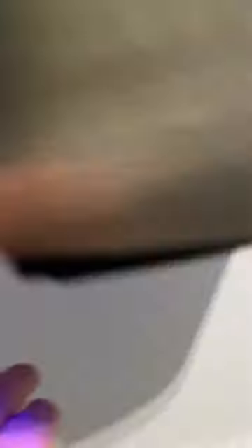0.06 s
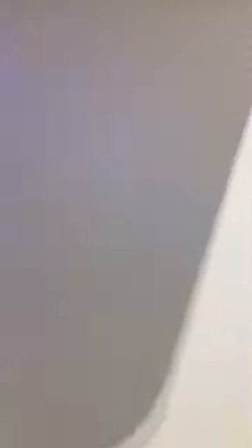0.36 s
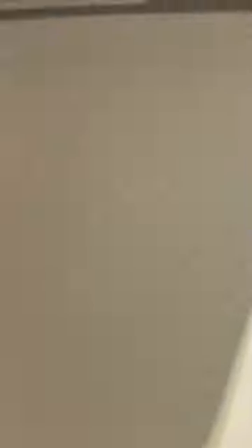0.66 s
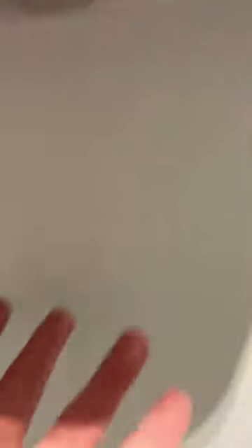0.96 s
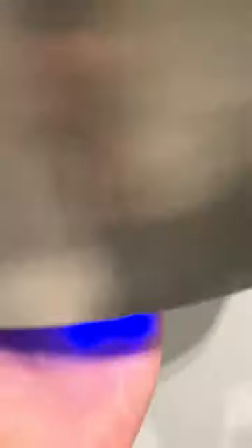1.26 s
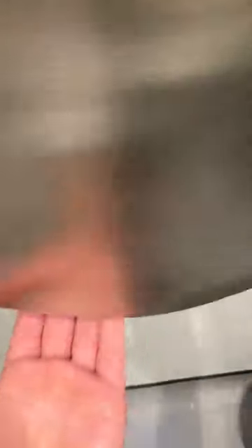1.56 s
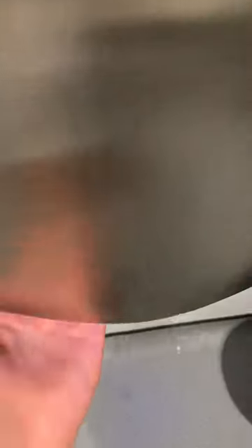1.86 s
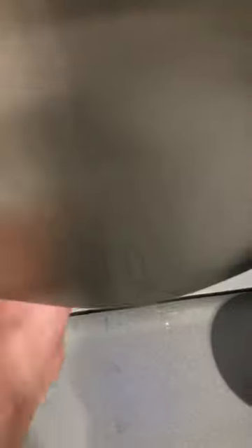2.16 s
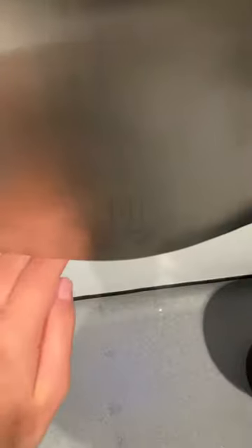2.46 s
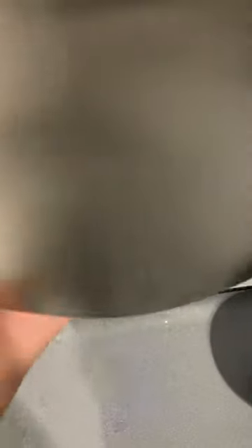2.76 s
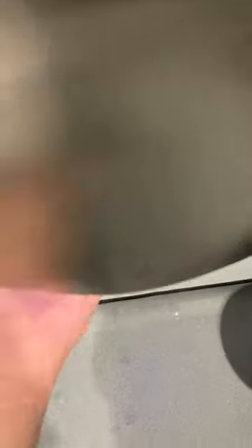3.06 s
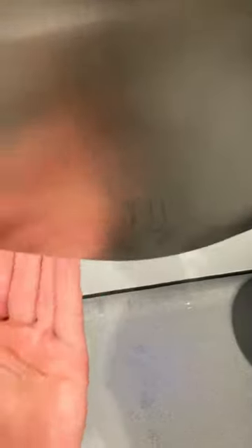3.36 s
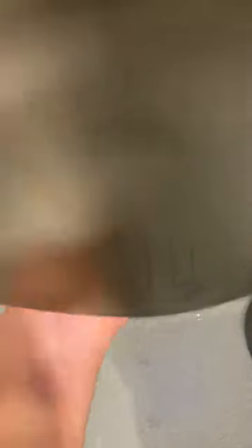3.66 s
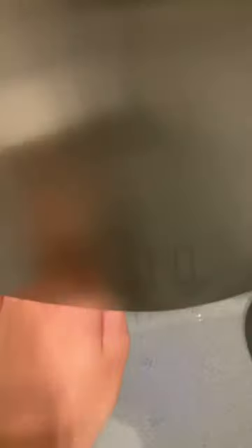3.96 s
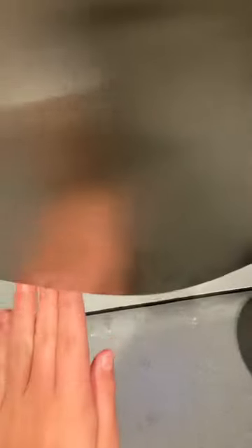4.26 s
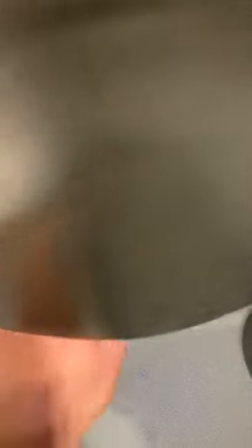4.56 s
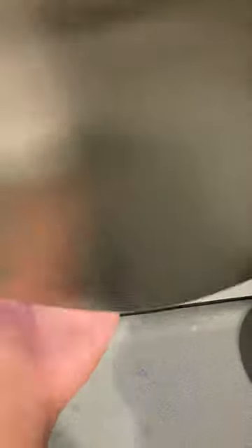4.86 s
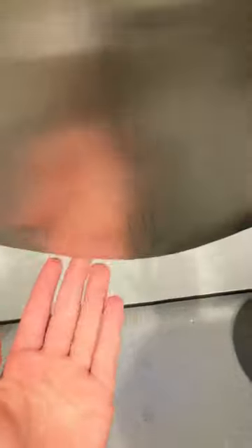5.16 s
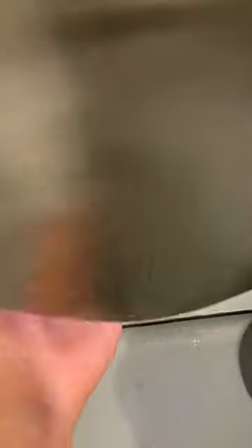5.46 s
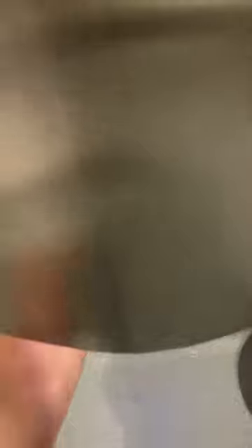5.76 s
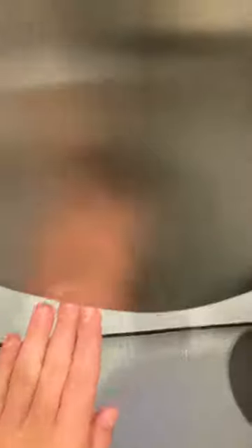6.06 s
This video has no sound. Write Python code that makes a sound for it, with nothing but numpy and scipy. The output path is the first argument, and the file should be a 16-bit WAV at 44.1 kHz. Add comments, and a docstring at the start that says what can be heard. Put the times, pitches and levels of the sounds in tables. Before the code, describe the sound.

Steady blowing and motor hum from a washroom hand dryer, sagging briefly early on, with repeated whooshes of air over a moving hand.

```python
"""A small tiled washroom, where an electric hand dryer runs close to a phone with two microphone ports.
Rotor unbalance hums at the shaft rate and drives the room's standing waves; the fan blades add a whine.
The motor cuts out for nearly half a second, coasts against air drag, and spins up when a hand returns.
The turbulent jet roars steadily, rushes and hisses on the turning hand, and at first buffets the ports."""
import sys
import numpy as np
from scipy import signal
from scipy.fft import rfft, irfft
from scipy.io import wavfile
from scipy.ndimage import uniform_filter1d

SR = 44100
rng = np.random.default_rng(int(sys.argv[2]) if len(sys.argv) > 2 else 0)


def wrap_up_sound(samples):
    """Save the sound to the file named by the first command line argument, as 16-bit audio."""
    columns = np.atleast_2d(samples).T
    # keep every value between -1 and 1, then stretch to whole-number steps
    tamed = np.clip(columns, -1, 1)
    steps = np.round(tamed * 32767).astype(np.int16)
    wavfile.write(sys.argv[1], SR, steps)


N = 270333
T = np.arange(N) / SR
HZ = np.fft.rfftfreq(N, 1 / SR)
FULL_HZ = 457.6  # shaft rate at full speed
POWER_OFF_S, POWER_ON_S = .602, 1.041

# resonances of housing, basin and room: f/Hz, width/Hz, lift/dB
ROOM_MODES = [(148.1, 12, 13.5), (168.4, 7.8, 6), (200.6, 8, 11.5), (249, 9, 7.5), (278.4, 7, 4.5),
              (311, 12, 4), (471, 7, 10), (629, 5.5, 8.5), (670, 11, 3), (678, 10, 3), (736, 32, 4.5),
              (812.4, 8.8, 7), (854, 8.1, 7), (1050, 36, 4), (1220, 21, 4), (1470, 8.4, 10), (1698, 14, 9),
              (2000, 90, 1)]
# resonances of the nozzle: f/Hz, width/Hz, lift/dB
NOZZLE_MODES = [(3020, 230, 2), (3850, 200, 0), (4720, 770, 4.5)]
# turns of the hand through the jet: peak t/s, rise/s, fall/s, rush level/dB, spill level/dB,
# hiss level/dB, f/Hz of the hollow above the palm, gain of its resonance
HAND_TURNS = [(0.29, 0.27, 0.11, -26.5, -35, -33, 1490, 0.33),
              (0.565, 0.18, 0.13, -29.5, -34, -29.5, 1720, 0.23),
              (0.744, 0.19, 0.24, -40.5, -42, -32.5, 2270, 0.45),
              (1.38, 0.15, 0.074, -36, -40.5, -44, 1560, 0.84),
              (1.58, 0.18, 0.35, -31, -34.5, -38, 1520, 0.18),
              (1.748, 0.17, 0.12, -30.5, -41, -47, 1480, 0.73),
              (2.31, 0.052, 0.26, -32, -34, -36, 1440, 0.33), (2.533, 0.11, 0.11, -31, -37, -36, 1470, 0.4),
              (2.85, 0.25, 0.42, -41.5, -43.5, -47, 1130, 0.54),
              (3.17, 0.11, 0.12, -27.5, -33.5, -49, 1970, 0.7),
              (3.344, 0.28, 0.11, -33, -38, -31.5, 1980, 0.73),
              (3.41, 0.073, 0.17, -27.5, -34, -39.5, 1270, 0.3),
              (3.74, 0.53, 0.11, -38.5, -57, -44, 1180, 0.74),
              (4.01, 0.13, 0.11, -31, -38.5, -46, 1410, 0.41),
              (4.075, 0.09, 0.13, -47, -33, -34, 1590, 0.46),
              (4.276, 0.097, 0.13, -48, -35, -37.5, 1980, 0.58),
              (4.405, 0.15, 0.12, -30.5, -39.5, -54, 1550, 0.59),
              (4.69, 0.15, 0.4, -40.5, -52, -46, 1150, 0.53),
              (4.908, 0.046, 0.14, -27.5, -38, -48, 1250, 1.4),
              (5.06, 0.25, 0.08, -35.5, -34.5, -38.5, 1590, 0.4),
              (5.225, 0.085, 0.18, -29, -35.5, -38.5, 1570, 0.78),
              (5.62, 0.39, 0.22, -41.5, -47, -45, 1150, 0.95),
              (5.88, 0.061, 0.1, -31, -38, -42, 1310, 0.61),
              (5.965, 0.063, 0.092, -31, -32.5, -38, 1760, 0.25),
              (6.1, 0.026, 0.077, -41, -39, -41, 1500, 0.37)]


def motor(shaft_hz, unsteady_hz=0.25):
    """A rotor radiates at its slightly unsteady rate of rotation and at multiples of it."""
    rotor_hz = shaft_hz + unsteady_hz * wander(11.3)
    return hum(rotor_hz) + whine(shaft_hz, rotor_hz)


def shaft_speed(half_speed_s=1.165, spin_up_s=.275, spin_up_shape=.948):
    """Quadratic air drag slows the unpowered rotor; under power the lost speed decays away."""
    unpowered_s = np.clip(T, POWER_OFF_S, POWER_ON_S) - POWER_OFF_S
    coasting_hz = FULL_HZ / (1 + unpowered_s / half_speed_s)
    still_lost = np.exp(-(np.maximum(T - POWER_ON_S, 0) / spin_up_s) ** spin_up_shape)
    return FULL_HZ - (FULL_HZ - coasting_hz) * still_lost


def hum(rotor_hz, gain_db=0.73, waver_db=0.87):
    """Rotor unbalance radiates a pure hum; it swells, dips sharply and shifts between left and right."""
    # course of the hum: t/s, relative level/dB, left minus right/dB
    hum_level = [(0.0, -15, -2), (0.3, -13.1, 0), (0.6, -11.5, 2.5), (0.76, -16.5, 1.8), (0.92, -21.5, 5),
                 (1.08, -19, 3.9), (1.22, -21.5, 5.4), (1.4, -19, 3), (1.54, -20.5, 13), (1.595, -35, -2),
                 (1.635, -20, 5.0), (1.77, -17.5, 2.1), (1.82, -25, 13.6), (1.95, -28.0, 6.6),
                 (2.15, -19, -1.5), (2.34, -17, 0.2), (2.6, -20, -1.3), (2.86, -23.1, -7.5),
                 (3.3, -18, 0.5), (3.8, -23, -5.5), (4.2, -19, -0.9), (4.47, -18.5, -2.2),
                 (4.65, -20.5, -4.3), (4.85, -20, -1.6), (5.27, -15.5, -0.5), (5.5, -18.5, -3),
                 (5.64, -23, -1.6), (6.13, -19.5, 0.5)]
    ports = standing_waves(rotor_hz)
    strength = amp(gain_db + curve(hum_level) + waver_db * wander(32))
    return ports * strength * panned(curve(hum_level, column=2))


def standing_waves(hz, direct_gain=0.035, right_lead_rad=0.37):
    """Forced vibration: a tone drives the room's modes, which ring on and beat with it as it glides."""
    # modes in and around the hum's range: f/Hz, width/Hz, signed gain at left port, at right port
    modes = [(339.0, 3.3, -0.35, -0.49), (347.7, 4.6, -0.4, -0.76), (366.0, 19.4, 0.12, 0.08),
             (378.9, 5.5, 0.93, 1.06), (380.6, 10.4, -1.22, -1.8), (397.1, 6.3, 0.62, 0.33),
             (404.7, 15.3, 0.87, -0.65), (409.3, 26.0, -1.9, -0.21), (417.1, 12.7, 1.72, 1.1),
             (424.6, 3.6, 0.3, 0.24), (434.6, 1.4, -0.24, -0.14), (436.9, 4.9, 0.4, 1.29),
             (441.4, 1.9, 0.47, 0.96), (448.0, 8.9, 1.54, 0.5), (451.0, 17.6, -2.5, 0.34),
             (455.2, 42.1, 1.24, -0.55), (456.1, 4.8, 1.11, 0.76), (467.7, 3.5, -1.36, 4.18)]
    settled_hz = np.pad(hz, (SR, 0), "edge")  # a second's lead lets the modes build up
    drive = np.exp(2j * np.pi * (np.cumsum(settled_hz) / SR + rng.random()))
    ports = direct_gain * drive[SR:]
    for mode_hz, width_hz, left, right in modes:
        radius = np.exp(-np.pi * width_hz / SR)
        ring = signal.lfilter([1 - radius], [1, -radius * np.exp(2j * np.pi * mode_hz / SR)], drive)
        ports = ports + np.outer([left, right], ring[SR:])
    return np.sqrt(2) * (ports * np.exp([[0], [1j * right_lead_rad]])).real


def whine(shaft_hz, rotor_hz, base_jitter_hz=3, strain_jitter=0.32, flicker_db=2.5, coast_db=3.5):
    """The fan blades sound shaft harmonics; frequency jitter smears them, most as the spin-up begins."""
    # harmonics: multiple of the shaft rate, level/dB before the housing, right port's lead/rad
    harmonics = [(2, -62, -11), (3, -54.5, 1), (6, -52, 1.13), (12, -87, -12)]
    # broad resonance of the housing: f/Hz, width/Hz, lift/dB
    housing_modes = [(2310, 320, 8.5)]
    # sharp resonance that rings on after a harmonic has passed: f/Hz, width/Hz, gain
    housing_ring = (2410, 5, 2)
    unpowered = uniform_filter1d(1. * ((T > POWER_OFF_S) & (T < POWER_ON_S)), SR // 20)
    strain_hz = (1 - unpowered / 2) * abs(FULL_HZ - shaft_hz)
    jitter_hz = (base_jitter_hz + strain_jitter * strain_hz) * wander(75)
    blades = 0
    for order, level_db, lead_rad in harmonics:
        note_hz = order * rotor_hz
        strength = amp(level_db + lift_db(housing_modes, note_hz) + flicker_db * wander(13))
        blades = blades + strength * tone(note_hz + jitter_hz, lead_rad)
    ring_hz, ring_width_hz, ring_gain = housing_ring
    blades = blades + ring_gain * resonate(blades, np.full(N, ring_hz), ring_width_hz)
    return blades * amp(coast_db * unpowered) * (shaft_hz / FULL_HZ) ** 2


def roar(shaft_hz, level_db=-30.5, speed_power=0.71, flutter_db=1.0):
    """Turbulence in the free jet and blower excites the room's modes, and weakens as the fan slows."""
    # jet spectrum: f/Hz, relative level/dB
    spectrum = [(20, -38), (45, -19), (90, -10), (170, -7), (330, 0), (750, 0.5), (1050, -6), (1500, -14),
                (2400, -19.5), (2900, -20.5), (4000, -22.5), (8000, -30.5), (12000, -22), (15500, -19)]
    strength = amp(level_db + flutter_db * wander(46)) * (shaft_hz / FULL_HZ) ** speed_power
    colour_db = across(spectrum) + lift_db(ROOM_MODES) + lift_db(NOZZLE_MODES) + echo_ripple_db()
    return strength * turbulence(colour_db)


def rush(shaft_hz, rest_db=-44, flutter_db=1.24, room_share=0.64, hollow_width_hz=380, pan_db=-2.0):
    """Impingement: the jet breaks on the palm, and the hollow above the cupped hand resonates."""
    # spectrum of the air on the palm: f/Hz, relative level/dB
    spectrum = [(200, -19), (600, -25), (930, 0), (1280, -1.5), (2020, -2), (2950, -8), (4100, -14.5),
                (7100, -55), (15400, -33)]
    modes_db = room_share * lift_db(ROOM_MODES) + lift_db(NOZZLE_MODES)
    air = turbulence(across(spectrum) + modes_db + echo_ripple_db())
    hollow = resonate(air, curve(HAND_TURNS, column=6), hollow_width_hz)
    air = unit(air + curve(HAND_TURNS, column=7) * hollow)
    return hand_gain(shaft_hz, rest_db, column=3) * amp(flutter_db * wander(18)) * panned(pan_db) * air


def spill(shaft_hz, rest_db=-46, flutter_db=1.72, gap_hz=3100, gap_gain=.3, drift_oct=.25, pan_db=-0.1):
    """Edge noise: air whooshes past the hand, coloured by the drifting resonance of the finger gaps."""
    # spectrum of the air at the hand's edge: f/Hz, relative level/dB
    spectrum = [(1250, -47), (2350, -0.5), (3050, 2), (3950, -1.5), (4950, -2), (6400, -3), (9100, -26),
                (15400, -24)]
    air = turbulence(across(spectrum) + lift_db(NOZZLE_MODES) + echo_ripple_db())
    gaps = resonate(air, gap_hz * 2 ** (drift_oct * wander(9.3)), width_hz=600)
    air = unit(air + gap_gain * gaps)
    return hand_gain(shaft_hz, rest_db, column=4) * amp(flutter_db * wander(30)) * panned(pan_db) * air


def hiss(shaft_hz, rest_db=-42, flutter_db=1.2, pan_db=-0.6):
    """Shear noise: fast air hisses over the fingers close to the nozzle."""
    # spectrum of the air on the fingers: f/Hz, relative level/dB
    spectrum = [(620, -20), (2050, -17), (3900, -6), (5400, -5.5), (7400, 1), (10100, 1), (12100, -5),
                (15400, -16)]
    strength = hand_gain(shaft_hz, rest_db, column=5) * amp(flutter_db * wander(20))
    air = turbulence(across(spectrum) + lift_db(NOZZLE_MODES) + echo_ripple_db())
    return strength * panned(pan_db) * air


def hand_gain(shaft_hz, rest_db, column, speed_power=1.8, edge_db=10.5, turn_shape=1.67):
    """Incoherent sources add in power: a resting noise set by the fan, plus a swell for each turn."""
    power = (amp(rest_db) * (shaft_hz / FULL_HZ) ** speed_power) ** 2
    for turn in HAND_TURNS:
        peak_s, rise_s, fall_s = turn[:3]
        from_peak = abs(T - peak_s) / np.where(T < peak_s, rise_s, fall_s)
        drop_db = edge_db * np.minimum(from_peak, 10) ** turn_shape  # shape 1 is pointed, 2 round
        power = power + amp(turn[column] - drop_db) ** 2
    return np.sqrt(power)


def sizzle():
    """Directivity: the nozzle's gush and the finest eddies at its lip are heard in line with the jet."""
    # the phone starts in the beam; later the hand throws spurts back: t/s, level/dB
    beam = [(0, -32), (.15, -24), (.58, -25.5), (.75, -32.5), (1, -33), (1.15, -38), (1.48, -40),
            (1.7, -60), (2.26, -65), (2.31, -33), (2.36, -38), (2.45, -50), (2.6, -70), (3.1, -55),
            (3.29, -37), (3.45, -55), (3.97, -58), (4.07, -35), (4.2, -55)]
    # spectrum at the nozzle lip: f/Hz, relative level/dB
    spectrum = [(300, 2), (700, 12), (1100, 2.5), (1900, -27), (3500, -9), (4900, -4.5), (7000, 0),
                (11000, -0.5), (13000, 0), (15500, -0.5)]
    return amp(curve(beam)) * turbulence(across(spectrum))


def gust():
    """The jet's turbulent edge sweeps across the phone in one hollow whoosh."""
    # passage of the edge: t/s, level/dB
    passage = [(.3, -62), (.52, -38), (.66, -35), (.73, -32), (.82, -49), (1.0, -90)]
    # its spectrum: f/Hz, relative level/dB
    spectrum = [(250, -30), (520, -5), (700, 1), (950, -5), (1500, -20), (4000, -47)]
    return amp(curve(passage)) * turbulence(across(spectrum))


def buffet(gain_db=5.5, lump_db=1.5, pan_db=-2, deep_hz=120):
    """Wind noise: eddies press on each port in lumps of its own, so the two are barely coherent."""
    # the draught until the phone leaves it, then a puff off the hand: t/s, relative level/dB, bass/dB
    draught = [(0, -34, -0.5), (.14, -32, -6), (.27, -28, -3), (.38, -24, -5), (.62, -30, 1), (.8, -32, 5),
               (.99, -31.5, 2), (1.05, -37.5, -2), (1.27, -56, 3), (1.6, -79, 0), (2.24, -65, 7),
               (2.33, -54, 10), (2.45, -62, 5)]
    # spectrum of the eddies: f/Hz, relative level/dB
    spectrum = [(20, -30), (45, -6.5), (80, 0.5), (170, -4), (280, 0.5), (600, -8.5), (1000, -16),
                (1600, -32), (4000, -21.5), (15000, -93)]
    lumps_db = lump_db * np.array([wander(35), wander(35)])
    air = turbulence(across(spectrum), coherence_scale=0.25)
    deep = irfft(rfft(air) / (1 + (HZ / deep_hz) ** 4), N)
    air = air - deep + deep * amp(curve(draught, column=2))
    return amp(gain_db + curve(draught) + lumps_db) * panned(pan_db) * air


def turbulence(colour_db, coherence_scale=1):
    """Coloured air noise of rms 1 reaches two spaced ports partly coherent and shifted in phase."""
    # phase between the ports: f/Hz, left port's lead/rad
    port_phase = [(20, 0), (200, 0), (500, -.55), (1000, -.3), (2100, .7), (4000, 1.4), (5600, 3.14),
                  (8400, 6.28), (11700, 9.42), (14800, 12.5), (16000, 12.8)]
    # likeness of the ports: f/Hz, coherence
    port_coherence = [(50, 0.94), (150, 1), (500, 0.94), (900, 0.73), (1500, 0.96), (3000, 0.56),
                      (4300, 0.97), (5600, 1), (8400, 1), (11700, 1), (15000, 0.98)]
    left, independent = rfft(rng.standard_normal((2, N)))
    coherence = np.clip(coherence_scale * across(port_coherence), 0, .995)
    right = coherence * left + np.sqrt(1 - coherence ** 2) * independent
    right = right * np.exp(-1j * across(port_phase))
    return unit(irfft(np.array([left, right]) * amp(colour_db), N))


def echo_ripple_db(depth_db=1.15, echoes=24, latest_s=.022):
    """Comb filtering: early echoes off walls and basin ripple the spectrum, mostly above the bass."""
    taps = np.zeros(N)
    taps[rng.integers(60, round(latest_s * SR), echoes)] = rng.choice([-1, 1], echoes)
    return depth_db * unit(rfft(taps).real) * HZ / (HZ + 400)


def lift_db(modes, at_hz=HZ):
    """Each resonance lifts the spectrum in a Lorentzian bell."""
    return sum(db / (1 + (2 * (at_hz - hz) / width_hz) ** 2) for hz, width_hz, db in modes)


def resonate(x, hz, width_hz):
    """A damped resonator of gain 1 whose natural frequency follows the curve hz."""
    carrier = np.exp(2j * np.pi * np.cumsum(hz) / SR)
    radius = np.exp(-np.pi * width_hz / SR)
    return 2 * (carrier * signal.lfilter([1 - radius], [1, -radius], x / carrier)).real


def tone(hz, right_lead_rad):
    """Phase is the integral of frequency: a gliding sine of rms 1 at both ports."""
    angle = 2 * np.pi * (np.cumsum(hz) / SR + rng.random())
    return np.sqrt(2) * np.sin([angle, angle + right_lead_rad])


def wander(rate_hz):
    """Low-passed noise: a slow random fluctuation of rms 1."""
    return unit(irfft(rfft(rng.standard_normal(N)) / (1 + (HZ / rate_hz) ** 2), N))


def panned(pan_db):
    """Left and right gains of constant total power."""
    gains = amp(np.array([pan_db, -pan_db]) / 2).reshape(2, -1)
    return gains / np.sqrt(np.mean(gains ** 2, axis=0))


def curve(rows, column=1):
    """One column of a time table, interpolated at every sample."""
    rows = np.asarray(rows, float)
    return np.interp(T, rows[:, 0], rows[:, column])


def across(points):
    """A frequency table, interpolated on a log axis at every bin."""
    hz, value = np.transpose(points)
    return np.interp(np.log(HZ + 1), np.log(hz + 1), value)


def amp(db):
    """Decibels to amplitude ratio."""
    return 10 ** (np.asarray(db) / 20)


def unit(x):
    """Scales to rms 1."""
    return x / np.sqrt(np.mean(x ** 2) + 1e-20)


def scene():
    """Superposition of motor, free jet, the jet on the hand, and air that reaches the phone directly."""
    shaft_hz = shaft_speed()
    on_hand = rush(shaft_hz) + spill(shaft_hz) + hiss(shaft_hz)
    return motor(shaft_hz) + roar(shaft_hz) + on_hand + sizzle() + gust() + buffet()


def record(dry, low_cut_hz=38, high_cut_hz=15750):
    """The phone acts as a band-pass filter: a bass cut and a steep upper limit."""
    thinned = signal.sosfilt(signal.butter(3, low_cut_hz, "high", fs=SR, output="sos"), dry)
    low_pass = signal.firwin(511, high_cut_hz, window=("kaiser", 9), fs=SR)
    return signal.oaconvolve(thinned, low_pass[None], "same", axes=1)


dry = scene()
out = record(dry)
wrap_up_sound(out)
```